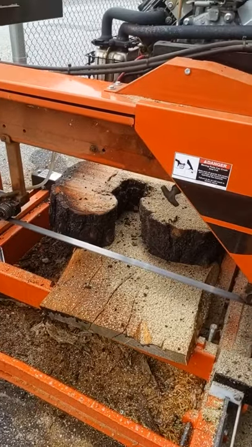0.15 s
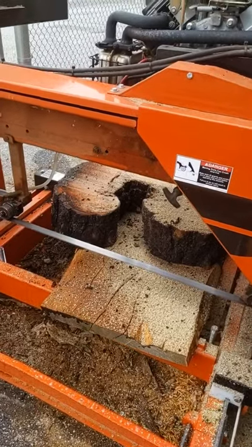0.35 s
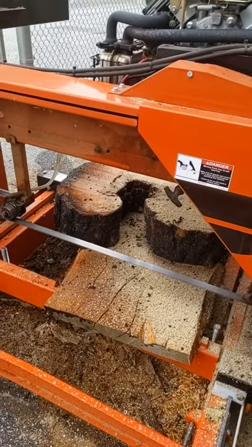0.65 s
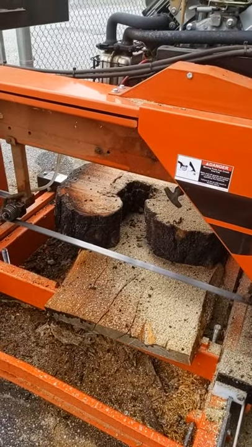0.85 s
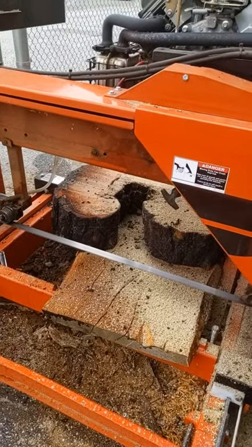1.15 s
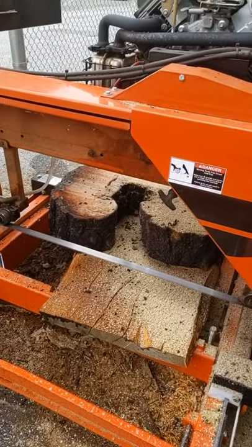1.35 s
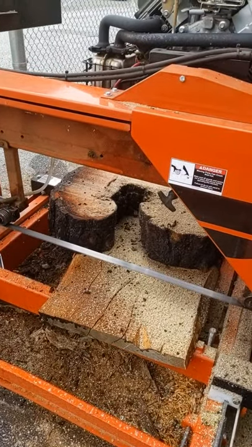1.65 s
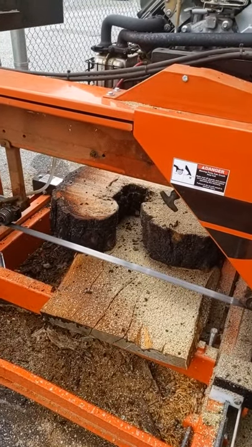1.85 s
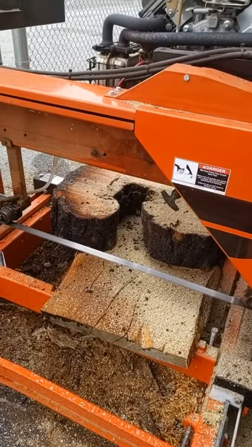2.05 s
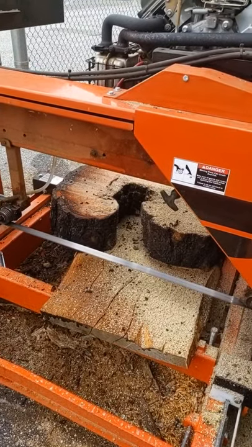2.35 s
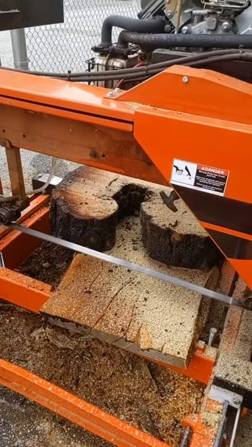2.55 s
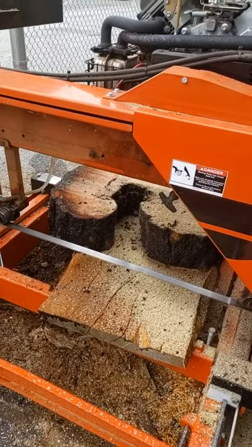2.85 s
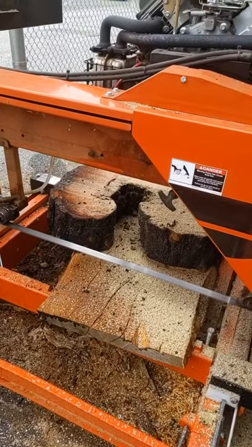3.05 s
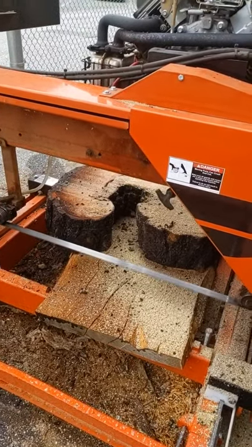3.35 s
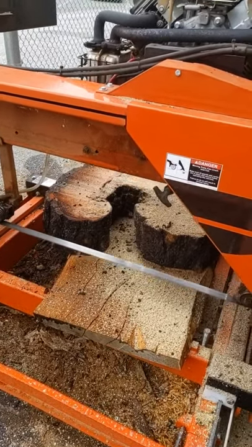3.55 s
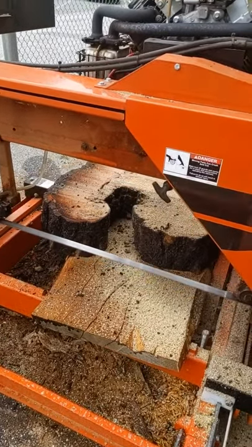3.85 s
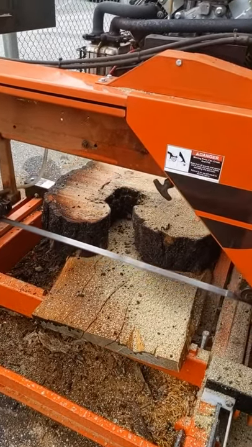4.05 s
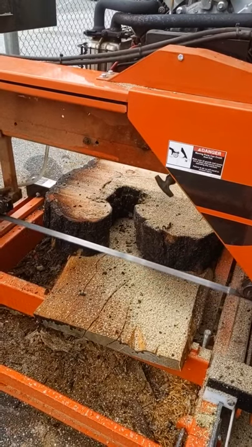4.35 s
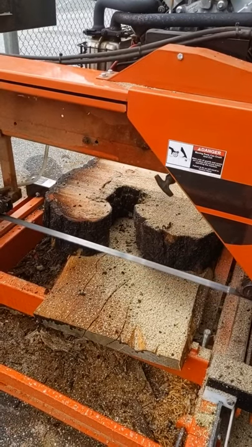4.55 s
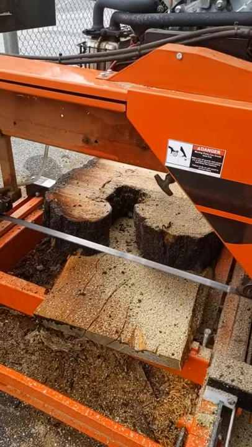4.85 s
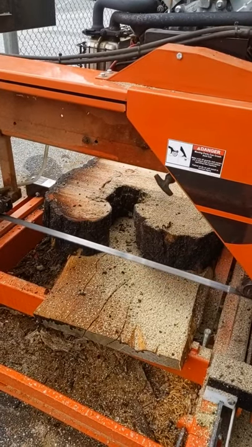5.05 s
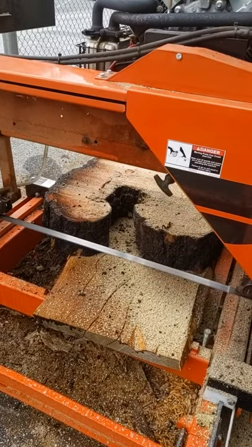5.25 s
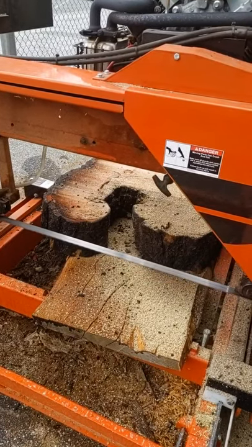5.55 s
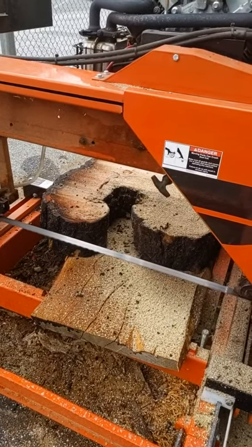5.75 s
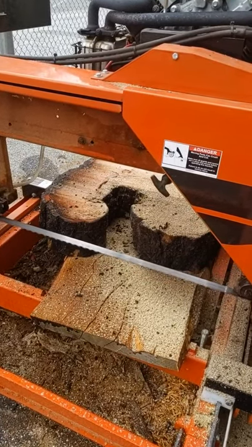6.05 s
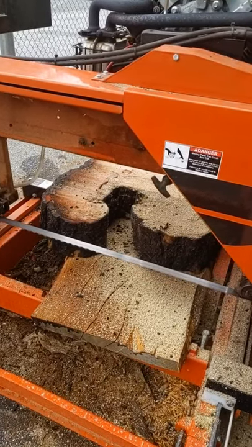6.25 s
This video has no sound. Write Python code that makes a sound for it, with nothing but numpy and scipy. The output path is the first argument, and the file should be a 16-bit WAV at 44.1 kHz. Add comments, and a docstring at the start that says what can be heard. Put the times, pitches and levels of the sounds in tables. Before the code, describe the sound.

Close outdoors, a portable sawmill's blade whooshes and sizzles with sliding metallic overtones while its diesel drops to a rumbling idle; guides squeak near the end.

```python
"""Outdoors, close to a portable band sawmill after the throttle is dropped, heard by one microphone.
The diesel engine, harmonics of its firing cycle over clatter noise, sinks to idle and swells up.
The steel band coasts down with a bright ringing hiss: friction noise coloured by resonances and
streaked by the falling overtones of a guide roller. A low knock comes late, and near the end a guide
squeaks a few times in short stick-slip tones."""
import sys
import numpy as np
from scipy import signal
from scipy.io import wavfile
from scipy.ndimage import uniform_filter1d

SR = 44100
rng = np.random.default_rng(int(sys.argv[2]) if len(sys.argv) > 2 else 0)


def put_to_file(sound):
    """Save the sound as 16-bit audio at rate SR, in the file named by the first command-line argument."""
    columns = np.atleast_2d(sound).T  # one column per channel
    safe = np.clip(columns, -1, 1)
    whole_steps = np.round(safe * 32767)
    wavfile.write(sys.argv[1], SR, whole_steps.astype(np.int16))


N = 281798
FRAME, HOP = 2048, 512  # short-time spectra, in samples


def gain_of(db):
    """Logarithmic level: decibels to amplitude ratio."""
    return 10 ** (np.asarray(db) / 20)


def evened(x):
    """Normalization of power: scales to rms 1."""
    return x / np.sqrt(np.mean(x ** 2) + 1e-20)


def read(points, hz):
    """Spectral envelope: levels interpolated along a log-frequency axis."""
    f, level_db = np.transpose(points)
    return np.interp(np.log(hz + 1), np.log(f + 1), level_db)


def curves(rows):
    """Piecewise-linear envelopes: every column after the time as a value per sample."""
    s, *columns = np.transpose(rows)
    now = np.arange(N) / SR
    return [np.interp(now, s, column) for column in columns]


def ramp(t, start_s, end_s):
    """Linear transition from 0 to 1 across a span of time."""
    return np.clip((t - start_s) / (end_s - start_s), 0, 1)


def wander(t, hz, count):
    """Band-limited fluctuation: random-phase sines up to hz, weaker when faster, joint rms 1."""
    f = np.geomspace(hz / 12, hz, 16)
    phase = rng.random((count, len(f), 1))
    sines = np.sin(2 * np.pi * (f[:, None] * t + phase))
    return evened((sines / np.sqrt(f[:, None])).sum(1))


def grid():
    """Short-time Fourier grid: bin frequencies as a column, frame times as a row."""
    bin_hz = np.fft.rfftfreq(FRAME, 1 / SR)[:, None]
    frame_s = np.arange(N // HOP + 5) * HOP / SR
    return bin_hz, frame_s


def resonate(x, hz, width):
    """One resonance by heterodyning: shifts hz down to zero, smooths, and shifts back."""
    carrier = np.exp(2j * np.pi * hz * np.arange(len(x)) / SR)
    pole = np.exp(-np.pi * width / SR)
    smooth = signal.lfilter([1 - pole], [1, -pole], x / carrier)
    return 2 * (carrier * smooth).real


def shaped(drive, field_db, patchy_db):
    """Time-varying filtering: colours a drive frame by frame with random patches, to rms 1."""
    patches = rng.standard_normal(field_db.shape[::-1]).T
    patches = uniform_filter1d(patches, size=6, axis=0)
    patches = evened(uniform_filter1d(patches, size=6, axis=1))
    spectra = signal.stft(drive, nperseg=FRAME, noverlap=FRAME - HOP)[2]
    spectra = spectra * gain_of(field_db + patchy_db * patches)[:, :spectra.shape[1]]
    return evened(signal.istft(spectra, nperseg=FRAME, noverlap=FRAME - HOP)[1][:N])


def exhaust_note(cycles):
    """Fourier synthesis: orders of the firing cycle with dispersed phases and cyclic irregularity."""
    # strength of each order while coasting: order (multiple of the cycle rate), relative level_db
    coasting_orders = [(1, -24), (2, -3), (3, 5), (4, -12), (5, -20), (6, 5.5), (7, -1.5), (8, 5.5),
                       (9, -9), (10, 1), (11, -11), (12, -17)]
    # strength of each order at idle: order (multiple of the cycle rate), relative level_db
    idling_orders = [(1, -40), (2, -40), (3, -40), (4, -31), (5, 1.5), (6, -7), (7, -11), (8, -3.5),
                     (9, -6), (10, -7.5), (11, -6), (12, 1.5), (13, 0), (14, -12), (15, -15), (16, -11),
                     (17, -4.5), (18, -2.5), (19, -7), (20, -9), (21, -15), (22, -22), (23, -13.5),
                     (24, -29.5)]
    # three unequal cylinders shift every third order alike
    cylinder_lags = (0, 0.37, 0.21)  # cycles of that order
    now, t = np.arange(N) / SR, grid()[1]
    fuel = ramp(now, start_s=.75, end_s=1.6)  # the governor brings the fuel back
    uneven = wander(t, hz=6., count=2 * len(idling_orders))
    coasting_db = dict(coasting_orders)
    note = np.zeros(N)
    for i, (order, idling_db) in enumerate(idling_orders):
        k = int(order)
        # firings differ from cycle to cycle, which blurs the high orders most
        slip = np.interp(now, t, uneven[2 * i])
        swell = np.interp(now, t, uneven[2 * i + 1])
        # the exhaust lets the low thump out first, the higher orders after it
        lag = .017 * k ** 2 + cylinder_lags[k % len(cylinder_lags)]
        size = fuel * gain_of(idling_db) + (1 - fuel) * gain_of(coasting_db.get(k, -60))
        phase = 2 * np.pi * (k * cycles - lag) + .017 * k * slip
        note += size * gain_of(.1 * k * swell) * np.cos(phase)
    # hold the half-second running rms at 1
    return note / np.sqrt(abs(uniform_filter1d(note ** 2, size=SR // 2)) + 1e-9)


def engine_clatter(cycles):
    """Amplitude-modulated noise: broadband clatter, panel resonances and a hum throb with the cycle."""
    # colour of the clatter noise: frequency_hz, relative density_db (per Hz)
    clatter_spectrum = [(18, -60), (42, -44), (65, -20), (112, -13), (160, -4), (230, 0), (326, -16),
                        (393, -8), (520, -12), (760, -10), (938, -6), (1130, -16.5), (1600, -21),
                        (2500, -18), (3250, -36), (5500, -120)]
    # ringing panels of the engine and frame:
    # frequency_hz, width_hz (each of two passes), level_db (re clatter noise), start_s, end_s
    panel_modes = [(155.3, 4.9, -4.5, 1.4, 2.8), (225.3, 9.1, -9, 1.2, 5), (386.8, 21, -12, -1.9, 7),
                   (709, 4.3, -14.5, 0.5, 7), (735.6, 16.5, -11, 3.5, 7), (882, 17, -20, 0.6, 7),
                   (939, 13, -11, 1.74, 7), (1050, 16, -23.5, 5.2, 7), (1158, 17, -13.5, 0.5, 4),
                   (1263, 6.6, -20.5, 1, 7), (1406, 45, -18.5, 4, 6.26), (1671, 28, -12.5, 2, 3.8)]
    now, (hz, t) = np.arange(N) / SR, grid()
    clatter = shaped(rng.standard_normal(N), read(clatter_spectrum, hz) + 0 * t, patchy_db=1.86)
    swells = wander(t, hz=5., count=len(panel_modes))
    for (f, width, db, start, end), swell in zip(panel_modes, swells):
        present = np.clip(np.minimum(now - start, end - now) / .4, 0, 1)
        level = gain_of(db + 1.5 * np.interp(now, t, swell))
        ring = resonate(resonate(rng.standard_normal(N), f, width), f, width)
        clatter += present * level * evened(ring)
    # a steady hum once the idle settles
    hum_order, hum_db, hum_start_s = 56, -11, 2.6  # multiple of the cycle rate, peak re clatter noise
    waver = np.interp(now, t, wander(t, hz=9., count=1)[0])
    hum = np.cos(2 * np.pi * hum_order * cycles + .7 * waver)
    clatter += gain_of(hum_db) * ramp(now, hum_start_s, hum_start_s + 1.5) * hum
    throb = (1 + 0.049 * np.cos(2 * np.pi * cycles)  # cycles
             + 0.07 * np.cos(2 * np.pi * 2 * cycles)  # crank turns
             + 0.03 * np.cos(2 * np.pi * 3 * cycles))  # firings
    return throb * clatter


def gear_whine(cycles):
    """Speed-locked tone: a high multiple of the cycle rate fades while the engine runs down."""
    order, level_db, gone_s = 44, -60, .8  # level at the start
    fade = np.clip(1 - np.arange(N) / SR / gone_s, 0, 1)
    return gain_of(level_db) * fade * np.cos(2 * np.pi * order * cycles)


def engine():
    """Phase integration: one running-down cycle rate drives exhaust note, clatter and whine."""
    # engine running down to idle: time_s, cycle_rate_hz (four-stroke cycles)
    engine_speed = [(0, 27.8), (.5, 22.6), (.75, 20.3), (1, 18.8), (1.5, 16.6), (2, 15), (2.5, 14),
                    (3, 13.4), (3.5, 13.1), (4.5, 13.01), (6.39, 13.06)]
    # levels: time_s, note_db (before a 0.5 dB cut), clatter_db (of the clatter noise)
    engine_levels = [(0, -49.5, -45), (.47, -46, -48.5), (.55, -54.5, -51.5), (.9, -61, -51.5),
                     (1.5, -54, -55.5), (2.5, -50, -53.5), (4, -46.5, -48.5), (5, -41.5, -42.5),
                     (5.8, -36, -39.5), (6.39, -32.5, -35.5)]
    cycles = np.cumsum(curves(engine_speed)[0]) / SR
    note_db, clatter_db = curves(engine_levels)
    note = gain_of(note_db - 0.5) * exhaust_note(cycles)
    return note + gain_of(clatter_db) * engine_clatter(cycles) + gear_whine(cycles)


def lifts(modes, t, waver):
    """Modal superposition: resonance humps summed in dB, each swelling and fading on its own."""
    hz, swells = grid()[0], wander(t, hz=6.5, count=len(modes))
    total_db = 0
    for (f, width, db), swell in zip(modes, swells):
        hump = 1 / (1 + (2 * (hz - f) / width) ** 2)
        total_db = total_db + db * np.clip(1 + waver * swell, 0, 3) * hump
    return total_db


def roller(steel_db):
    """Periodic excitation: knocks repeat every turn, so overtones slide down, flaring across modes."""
    # strongest overtones the roller's worn rim drums into the band:
    # overtone (multiple of the roller's speed), relative level_db
    strong_overtones = [(25, 6), (26, 7), (30, 6), (34, 6), (37, 9), (39, 6), (40, 7), (41, 8), (42, 5),
                        (43, 5), (44, 7), (48, 5)]
    start_hz, slowing, drag = 162.5, 22.9, .2  # turns per s, lost per s, lost per s squared
    level_db, fade_start_s, fade_db_per_s = -7.7, 3.85, 32  # level re each friction noise before the fade
    t = np.arange(N) / SR
    turns = np.cumsum(start_hz - slowing * t - drag * t ** 2) / SR
    strong_db = dict(strong_overtones)
    rim = np.linspace(0, 1, 8192)  # one turn
    knocks = np.zeros(len(rim))
    for k in range(14, 76):
        weak_db = 1.5 + 2 * rng.standard_normal()
        knocks += gain_of(strong_db.get(k, weak_db)) * np.cos(2 * np.pi * (k * rim + rng.random()))
    comb = np.interp(turns % 1, rim, knocks)
    fade_db = fade_db_per_s * np.maximum(t - fade_start_s, 0)
    return gain_of(level_db - fade_db) * shaped(comb, 1.2 * steel_db, patchy_db=2.2)


def band():
    """Source-filter principle: friction and roller beats ring steel modes that change as it slows."""
    # levels before surge and flutter: time_s, whirr_db (wheels and guides), sizzle_db, top_hiss_db
    band_levels = [(0, -42, -35, -17.5), (.16, -43.5, -37, -21), (.3, -43, -33.5, -17.5),
                   (.8, -44.5, -37.5, -19.5), (1.5, -43.5, -35.5, -19.5), (2.4, -44, -32.5, -21),
                   (3.3, -40, -31.5, -21.5), (4.28, -37.5, -31, -22), (4.35, -37, -34.5, -24),
                   (4.75, -36.5, -34.5, -22), (5.2, -37, -36.5, -26), (6, -37, -37.5, -27),
                   (6.07, -34.5, -37, -25), (6.15, -36.5, -36.5, -28.5), (6.39, -36, -42, -28.5)]
    # four colours: frequency_hz, relative density_db (per Hz)
    whirr_spectrum, sizzle_spectrum = [(760, -10), (1300, -13.5), (1860, -16), (2800, -7), (3360, -7.5),
                                       (3970, -7), (4420, -10), (4880, -6.5), (5730, -3.5), (6270, -6),
                                       (6870, 3.5), (7640, -9), (8000, -4.5), (10400, -8), (17600, -120)], [(4650, -49.5), (7900, -4.5), (8530, -0.5),
                                                      (9350, -2.5), (10900, 2.5), (14200, -11),
                                                      (22000, -120)]
    hiss_at_speed, hiss_slowed = [(6350, -41), (10800, -16.5), (11400, -15.5), (11800, -10.5),
                                  (12900, -9.5), (14100, -4), (14900, -6.5), (15800, -14.5)], [(9000, -60), (10700, -8), (11000, 12.5), (11400, 14),
                                                     (12500, 12), (13600, 14), (15100, 13.5), (15800, 8.5)]
    # modes of the steel band, lifts before their swell:
    # frequency_hz, width_hz, lift_at_speed_db, lift_slowed_db
    steel_modes = [(2070, 230, 1.5, 11), (2730, 32, 3.5, 2.5), (2860, 53, 4, 2), (3050, 126, 0.5, 5),
                   (3670, 86, 0.5, 4.5), (3860, 70, 2.5, 4.5), (4046, 126, 5, 0), (4710, 83, 4, 6.5),
                   (4827, 92, 4.5, -0.5), (5020, 89, 6, -2), (5150, 42, 1.5, 6.5), (5554, 180, 5, -3),
                   (5690, 140, 4, 4), (5880, 110, 3, 7.5), (6220, 100, 3.5, -1), (6730, 140, 2, 0.5),
                   (7045, 105, 1.5, 4), (7180, 160, 4, -0.5), (8290, 200, 4, 5.5), (8780, 120, 3.5, 3),
                   (9800, 200, 3.5, 0), (12100, 140, 3.5, 0), (12550, 250, 1, 3), (13650, 260, 4, .5),
                   (14300, 320, 5, 3)]
    whirr_db, sizzle_db, hiss_db = curves(band_levels)
    now, (hz, t) = np.arange(N) / SR, grid()
    slowed = ramp(t, start_s=2.43, end_s=5.6)  # the colour turns from fast to slow
    modes = [(f, width, fast + (slow - fast) * slowed) for f, width, fast, slow in steel_modes]
    steel_db = lifts(modes, t, waver=.18)
    flutter = wander(now, hz=62.24, count=1)[0]  # the band flaps on its guides
    rub = rng.standard_normal((3, N)) + roller(steel_db)
    whirr = shaped(rub[0], read(whirr_spectrum, hz) + steel_db, patchy_db=2.5)
    sizzle = shaped(rub[1], read(sizzle_spectrum, hz) + steel_db, patchy_db=3.0)
    hiss_colour_db = (1 - slowed) * read(hiss_at_speed, hz) + slowed * read(hiss_slowed, hz)
    hiss = shaped(rub[2], hiss_colour_db + steel_db, patchy_db=1.5)
    hiss /= np.sqrt(abs(uniform_filter1d(hiss ** 2, size=SR // 2)))  # half-second running rms of 1
    # uneven drag on the guides: surge of the hiss, deeper once slowed
    depth_db = .5 + (1.0 - .5) * slowed
    surge_db = np.interp(now, t, depth_db * wander(t, hz=45., count=1)[0])
    whirr *= gain_of(whirr_db + 0.2 * surge_db + 0.077 * flutter)
    sizzle *= gain_of(sizzle_db + 1.03 * surge_db + 0.29 * flutter)
    hiss *= gain_of(hiss_db + surge_db + 0.45 * flutter)
    return whirr + sizzle + hiss


def bump():
    """Transient pulse: a low knock on the microphone as a sine in a bell-shaped envelope."""
    start_s, envelope_peak_db, pitch_hz = 4.75, -42, 60
    t = np.arange(N) / SR - start_s
    envelope = np.exp(-(t / 0.016 - 1) ** 2)  # peaks 16 ms after start_s
    return gain_of(envelope_peak_db) * envelope * np.sin(2 * np.pi * pitch_hz * t)


def squeaks():
    """Stick-slip: short tones, each with an overtone an octave above, sag slightly over a rough scrape."""
    # guide squeaks: start_s, peak_db (of the fundamental)
    squeak_events = [(5.177, -28), (5.425, -28), (5.717, -35), (6.077, -24.5)]
    start_hz, end_hz, scrape_width_hz = 5840, 5770, 800.  # width of each of two passes
    hard_db = -28  # above this level a squeak grows harsher and longer
    out, t = np.zeros(N), np.arange(4000) / SR
    phase = 2 * np.pi * np.cumsum(np.interp(t, [0, .025], [start_hz, end_hz])) / SR
    rise = np.minimum(t / 0.0035, 1)
    for s, db in squeak_events:
        hard = max(db - hard_db, 0)
        harsh_db = 1.6 * hard  # gained by overtone and scrape
        held_s = .007 + .0015 * hard
        decay = gain_of(-60 * np.maximum(t - held_s, 0) / 0.04)
        tone = decay * (np.sin(phase) + gain_of(-12 + harsh_db) * np.sin(2 * phase))
        noise = resonate(rng.standard_normal(len(t)), end_hz, scrape_width_hz)
        scrape = evened(resonate(noise, end_hz, scrape_width_hz))
        scrape_gain = gain_of(-15 + harsh_db - 60 * t / .26)
        sound = gain_of(db) * rise * (tone + scrape_gain * scrape)
        part = out[round(s * SR):][:len(t)]
        part += sound[:len(part)]
    return out


def scene():
    """Linear superposition: all sources reach one capsule, so both channels are alike."""
    return np.tile(engine() + band() + bump() + squeaks(), (2, 1))


def record(dry):
    """Band limitation: a linear-phase low-pass filter removes the highest treble."""
    edge_hz = 15740
    lowpass = signal.firwin(1023, edge_hz, window=("kaiser", 9), fs=SR)
    return signal.oaconvolve(dry, lowpass[None], "same")


dry = scene()
out = record(dry)
put_to_file(out)
```